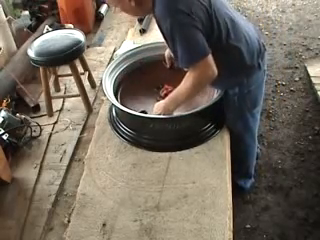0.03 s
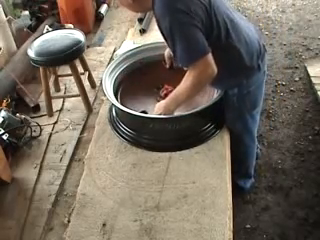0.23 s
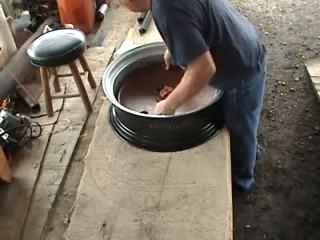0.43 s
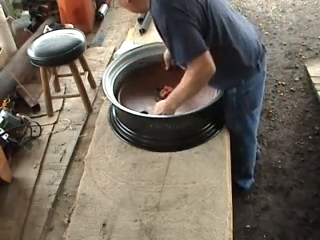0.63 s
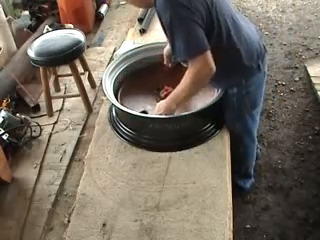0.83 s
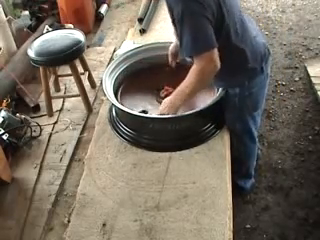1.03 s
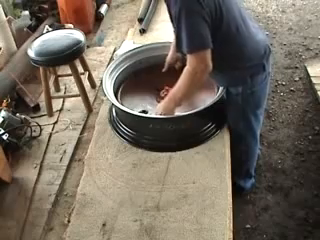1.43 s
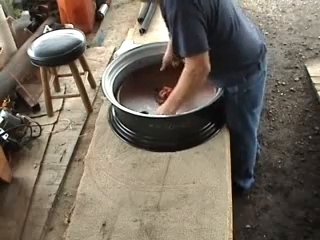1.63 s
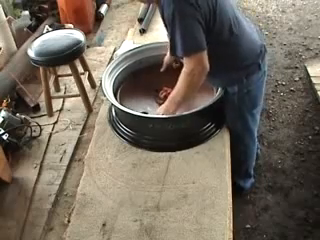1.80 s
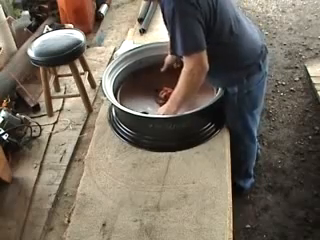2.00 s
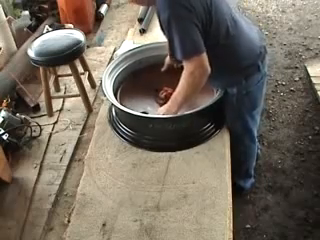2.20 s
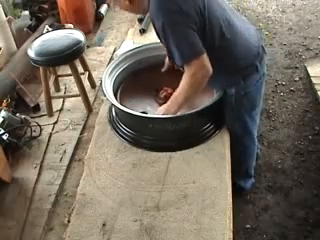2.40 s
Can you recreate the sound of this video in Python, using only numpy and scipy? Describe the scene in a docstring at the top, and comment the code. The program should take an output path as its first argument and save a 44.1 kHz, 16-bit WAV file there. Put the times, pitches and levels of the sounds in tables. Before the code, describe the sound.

A metal part knocks around inside a steel wheel rim, with short ringing clanks.

```python
"""Inside a shed, close to a steel wheel rim that lies on the wooden floor, heard in stereo.
A part is worked about inside the rim, metal knocking on metal: each clank cracks, chatters for a
moment and rings the rim's modes according to the spot that is hit; the shed's echo blurs the ring.
Between clanks come light scrapes and one soft bump through the boards.
Behind it all are a steady workshop rumble and a faint insect."""
import sys
import numpy as np
from scipy import signal
from scipy.fft import rfft, irfft, next_fast_len
from scipy.io import wavfile
from scipy.ndimage import uniform_filter1d, minimum_filter1d, map_coordinates

SR = 44100
rng = np.random.default_rng(int(sys.argv[2]) if len(sys.argv) > 2 else 0)


def dump(signal):
    """Clip the signal to [-1, 1] and save it as 16-bit WAV at the path in sys.argv[1]."""
    limited = np.clip(np.atleast_2d(signal).T, -1, 1)
    pcm = np.round(limited * 32767).astype(np.int16)
    wavfile.write(sys.argv[1], SR, pcm)


N = 112454
T = np.arange(N) / SR

# Stereo width of the metal at the microphone: frequency_hz, side_db
METAL_WIDTH = [(100, -23), (600, -28.5), (1200, -19), (2500, -17.5), (6000, -22), (12000, -12)]
CHATTER_RATE_HZ, CHATTER_SPREAD_DB = 160, 1.6  # contacts a second, their spread in level


def amp(db):
    """Decibels to gain."""
    return 10 ** (np.asarray(db) / 20)


def unit(x):
    """Scale to rms 1."""
    return x / np.sqrt(np.mean(x ** 2) + 1e-20)


def along(points, hz):
    """Read (frequency_hz, value) points on a log frequency axis."""
    frequencies, values = np.transpose(points)
    return np.interp(np.log(hz + 1), np.log(frequencies + 1), values)


def wobble(rate_hz):
    """A smooth random curve with rate_hz knots a second."""
    return map_coordinates(rng.standard_normal(4096), [T * rate_hz], mode="wrap")


def filtered(x, response):
    """Filter x by a gain that is a function of frequency."""
    size = next_fast_len(N + SR // 4)
    return irfft(rfft(x, size) * response(np.fft.rfftfreq(size, 1 / SR)), size)[..., :N]


def noise(spectrum, width):
    """Coloured stereo noise of rms 1; width sets the side level against the mid."""
    white = rng.standard_normal((2, N))
    mid, side = filtered(white, lambda hz: amp(along(spectrum, hz) + [0 * hz, along(width, hz)]))
    return unit(np.array([mid + side, mid - side]))


def rise(start_s, rise_s):
    """Opens from 0 towards 1 after start_s, with time constant rise_s."""
    return 1 - np.exp(-np.maximum(T - start_s, 0) / max(rise_s, 1e-4))


def fall(start_s, t60_s):
    """Stays at 1 until start_s, then dies away."""
    return amp(-60 * np.maximum(T - start_s, 0) / t60_s)


def fade(x, start_s, hold_s, decay_times):
    """After a hold that is shorter in the treble, each frequency dies at its own speed."""
    half_hold_hz = 6200  # later contacts are softer and feed the treble less
    hz, t, spectra = signal.stft(x, SR, nperseg=256)
    release_s = start_s + hold_s / (1 + (hz[:, None] / half_hold_hz) ** 2)
    decay = amp(-60 * np.maximum(t - release_s, 0) / along(decay_times, hz)[:, None])
    return signal.istft(spectra * decay, SR)[1][:, :N]


def workshop_rumble():
    """Room tone: steady rumble and hiss with a wavering machine hum."""
    # Tones of the hum: pitch_hz, level_db
    hum_tones = [(61, -50), (122, -46), (479, -42.5), (872, -52.5)]
    # Colour of the room tone: frequency_hz, relative_db
    air_spectrum = [(15, -52), (25, -14), (59, -4), (76, 0.5), (92, -13.5), (114, -0.5), (134, -3.5),
                    (149, -7), (180, -1.5), (200, -10.5), (217, -5.5), (317, -5.5), (354, -5.5), (476, -5),
                    (591, -8.5), (796, -13), (863, -6), (962, -14.5), (1100, -12.5), (3160, -28.5),
                    (7110, -36.5), (11000, -33.5), (16000, -44.5)]
    # Its stereo width: frequency_hz, side_db
    air_width = [(60, -18.5), (130, -18.5), (290, -17.5), (640, -14), (1410, -10.5), (3100, -8.5),
                 (6820, -11), (15000, -1.5)]
    air_db, swell_db, waver = -30.5, 1.13, 0.44
    hum = 0
    for hz, db in hum_tones:
        level = amp(db) * np.sqrt(2) * (1 + waver * wobble(7.78))
        hum += level * np.sin(2 * np.pi * hz * T + 2 * waver * wobble(6.88))
    return amp(air_db + swell_db * wobble(5.9)) * noise(air_spectrum, air_width) + hum


def insect():
    """Three faint, high, evenly spaced chirps of narrow-band noise."""
    # The insect's chirps: centre_s, level_db
    chirps = [(.89, -51), (1.24, -45), (1.585, -46.5)]
    pitch_hz, sigma_hz, sigma_s = 8200, 350, 0.013
    white = rng.standard_normal((2, N))
    buzz = unit(filtered(white, lambda hz: np.exp(-.5 * ((hz - pitch_hz) / sigma_hz) ** 2)))
    return buzz * sum(amp(db) * np.exp(-.5 * ((T - centre_s) / sigma_s) ** 2) for centre_s, db in chirps)


def shed_echo(direct):
    """The shed's late echo reaches the microphone just after the direct sound."""
    # Reverberation of the shed: frequency_hz, t60_s
    decay_times = [(200, .5), (1500, 0.48), (5000, .35), (12000, .2)]
    wash = noise(spectrum=[(100, 0), (10000, 0)], width=[(100, -26), (5000, -4)])
    tail = fade(wash, 0, 0, decay_times) * rise(start_s=0.0087, rise_s=0.011)
    return signal.fftconvolve(direct, tail / np.linalg.norm(tail[0]), axes=1)[:, :N]


def floor_bump():
    """The rim's weight shifts and thumps the floorboards."""
    # Modes of the boards: pitch_hz, level_db, t60_s
    boards = [(60, -21.5, 0.39), (72, -37, 0.12), (126.5, -28.5, 0.35)]
    start_s = 1.298
    thump = sum(amp(db) * fall(start_s, t60_s) * np.sin(2 * np.pi * hz * (T - start_s))
                for hz, db, t60_s in boards)
    return thump * rise(start_s, rise_s=0.013)


def scrapes():
    """The part slides briefly over the steel."""
    # Light slides of the part: start_s, length_s, level_db
    slides = [(0, 0.009, -26.5), (0.112, 0.03, -25.5), (1.287, .02, -29), (1.91, .01, -34),
              (1.972, 0.024, -32)]
    # Colour of the scraping: frequency_hz, relative_db
    spectrum = [(100, -43), (300, 7.5), (900, -2.5), (2000, -3.5), (3200, -11.5), (5000, -18), (9000, -21),
                (15000, -32)]
    level = sum(amp(db) * rise(start_s, rise_s=0.0034) * fall(start_s + length_s, t60_s=0.24)
                for start_s, length_s, db in slides)
    return level * amp(CHATTER_SPREAD_DB * wobble(CHATTER_RATE_HZ)) * noise(spectrum, METAL_WIDTH)


def ripple(x):
    """Many close modes make a spectrum uneven, most of all in the treble."""
    depth_db, spacing_hz, full_depth_hz = 3.8, 55, 2500
    knots = rng.standard_normal(2048)

    def response(hz):
        peaks = map_coordinates(knots, [hz / spacing_hz], mode="wrap")
        return amp(depth_db * np.minimum(hz / full_depth_hz, 1) * peaks)
    return unit(filtered(x, response))


def clatter(start_s, rise_s, chatter_s, decay_ratio, tilt_db_per_octave, spot):
    """Chattering contacts excite the dense, short modes of the rim and the loose part."""
    # Colour of the dense modes, for each spot: frequency_hz, relative_db
    spectra = { "a": [(60, -26), (130, -7.5), (330, -7.5), (660, -2), (1050, -3.5), (1250, -6),
               (1950, -6.5), (2700, -11.5), (3500, -21), (5000, -27), (8000, -40.5), (15000, -52)],
               "b": [(60, -13), (170, -8.5), (330, 1), (560, -0.5), (740, 8.5), (890, -11), (1090, 11.5),
               (1250, -1), (1600, 0), (2700, -10.5), (3400, -21), (6400, -26.5), (9000, -40), (15000, -49)],
               "c": [(60, -26), (160, 2), (400, -0.5), (750, 2.5), (900, 2.5), (1500, 8.5), (1950, 4),
               (2700, -2.5), (3500, -11.5), (5200, -18), (8000, -29), (15000, -45)], "d": [(60, -31),
               (160, -3), (400, 1.5), (600, -3), (800, 3.5), (1150, 5.5), (1350, -9), (1650, 2),
               (2300, -13), (2800, -10), (3450, -27), (5000, -30), (9500, -38), (15000, -58)]}
    # Their usual decay: frequency_hz, t60_s
    usual_decay = [(150, 0.31), (500, 0.19), (1200, 0.21), (2800, 0.25), (6000, 0.3), (12000, 0.15)]
    colour = [(hz, db + tilt_db_per_octave * np.log2(max(hz / 1000, 1))) for hz, db in spectra[spot]]
    decay_times = [(hz, t60_s * decay_ratio) for hz, t60_s in usual_decay]
    modes = ripple(noise(colour, METAL_WIDTH))
    burst = fade(modes, start_s, chatter_s, decay_times) * rise(start_s, rise_s)
    return burst * amp(CHATTER_SPREAD_DB * wobble(CHATTER_RATE_HZ))


def rim_ring(start_s, rise_s, chatter_s, spot):
    """The rim's clear modes swell while the metal chatters, then ring out."""
    # Modes of the rim, by spot hit: pitch_hz, t60_s, spot_a_db, spot_b_db, spot_c_db, spot_d_db
    modes = [ (523, 0.36, -15, -21, -32, -17.5), (682, 0.33, -11.5, -20, -15.5, -44),
             (730.7, 0.12, -13.5, -14, -30, -25), (789, 0.22, -13, -34, -15, -5.5),
             (949, 0.43, -13, -43, -13.5, -29), (1036, 0.23, -6, -13, -7, -17),
             (1070, 0.34, -31, -27, -11, -17.5), (1093, 0.18, -37, -4, -35, -16),
             (1167, .23, -25, -21, -21, -17), (1264, 0.26, -17.5, -45, -11, -18),
             (1440, 0.31, -11, -24, -11.5, -30), (1466, 0.31, -12, -18, -41, -22),
             (1522, 0.22, -22, -36, -19, -17.5), (1562, 0.17, -19, -12.5, -9, -20),
             (1606, .24, -27, -41, -24, -39), (1662, 0.63, -26.5, -36, -22, -28.5),
             (1824, 0.11, -14, -35, -14, -46), (1862, 0.22, -8, -28, -10.5, -42),
             (2040, .25, -26, -23, -39, -35), (2193, 0.34, -13.5, -18, -35, -30.5),
             (2300, 0.24, -30, -38, -15, -43), (2437, 0.22, -17, -30, -32, -35),
             (2500, 0.32, -28, -23, -12, -35), (2665, .25, -22.5, -26.5, -14.5, -25),
             (2884, 0.23, -40, -32, -32, -42), (3012, 0.17, -38, -45, -20, -46),
             (3140, 0.3, -22.5, -31.5, -24, -40), (4270, 0.27, -41, -52, -28, -53),
             (6500, 0.18, -45, -31.5, -37, -56), (9250, 0.15, -52, -60, -51, -41.5)]
    build_s, hold_s = 0.0079, .45 * chatter_s  # only the early chatter feeds the clear modes
    blur_depth, blur_rate_hz = 0.2, 38.7  # each mode is unsteady in level and phase
    out = np.zeros((2, N))
    ringing = (T >= start_s) & (T < start_s + .7)
    t = T[ringing] - start_s
    for hz, t60_s, *spot_db in modes:
        knots = rng.standard_normal((2, 256))
        blur = [blur_depth * map_coordinates(row, [t * blur_rate_hz], mode="wrap") for row in knots]
        phase = 2 * np.pi * (hz * t + rng.random())
        level = amp(spot_db["abcd".index(spot)] - 60 * np.maximum(t - hold_s, 0) / t60_s)
        mid = np.sin(phase) * (1 + blur[0]) + np.cos(phase) * blur[1]
        side = amp(along(METAL_WIDTH, hz)) * np.sin(phase + 2 * np.pi * rng.random())
        out[:, ringing] += level * np.array([mid + side, mid - side])
    return out * rise(start_s, build_s + rise_s)


def clanks():
    """Each blow of the part: a crack at first contact, a burst of clatter and the ring of the rim."""
    # Blows on the rim: start_s, ring_db, clatter_db, crack_db, rise_s, chatter_s,
    # decay_ratio, tilt_db_per_octave (above 1 kHz), spot
    blows = [ (.132, 0, -7, -42, 0.0082, 0.055, 0.95, -0.2, "a"),
             (0.807, -8, -11.5, -16, 0.00064, .022, 0.95, -2, "b"),
             (1.0808, -2, -12, -17, 0.0013, 0.021, 0.89, 1.9, "b"),
             (2.0061, 1.5, -6.5, -4.5, 0.00078, 0.03, 1.34, 1.8, "c"),
             (2.1335, 0.5, -7.5, -12, 0.0014, 0.017, 0.75, 1.8, "d"),
             (2.218, -3.5, -10, -16, 0.0013, 0.017, 0.76, 0, "d")]
    # Colour of the first contact: frequency_hz, relative_db
    crack_spectrum = [(100, -27), (400, 3), (1000, 3.5), (2200, 3), (3200, -13), (5500, -22.5), (9000, -31),
                      (15000, -41)]
    crack = noise(crack_spectrum, METAL_WIDTH)
    out = np.zeros((2, N))
    for start_s, ring_db, clatter_db, crack_db, rise_s, chatter_s, decay_ratio, tilt, spot in blows:
        out += amp(crack_db) * crack * rise(start_s, rise_s=0.00054) * fall(start_s, t60_s=0.041)
        out += amp(clatter_db) * clatter(start_s, rise_s, chatter_s, decay_ratio, tilt, spot)
        out += amp(ring_db) * rim_ring(start_s, rise_s, chatter_s, spot)
    return out


def scene():
    """At the microphone: the metal in front, its echo well below it, the quiet sources around it."""
    metal = clanks() + scrapes()
    return metal + amp(-21.5) * shed_echo(metal) + floor_bump() + insect() + workshop_rumble()


def record(dry):
    """A fast limiter holds the loudest clanks near full scale; nothing above the band limit is kept."""
    ceiling, window_samples, top_hz = 1.03, 31, 16000
    needed_gain = 1 / np.maximum(np.abs(dry).max(axis=0) / ceiling, 1)
    gain = uniform_filter1d(minimum_filter1d(needed_gain, window_samples), window_samples)
    return filtered(dry * gain, lambda hz: hz < top_hz)


dry = scene()
out = record(dry)
dump(out)
```